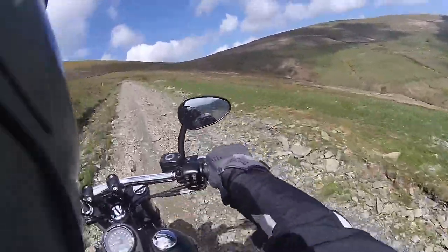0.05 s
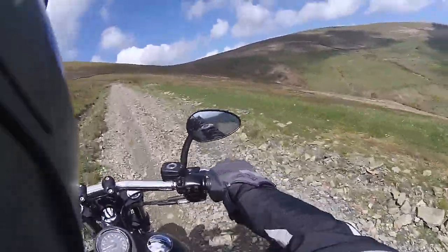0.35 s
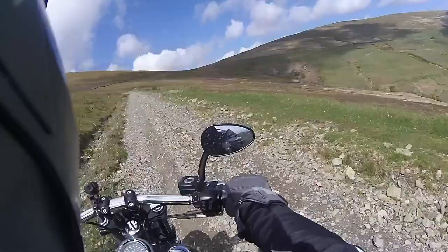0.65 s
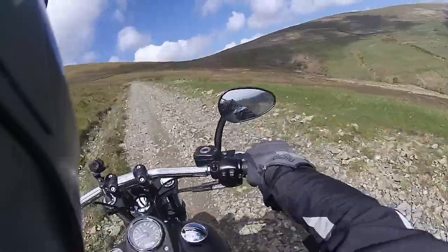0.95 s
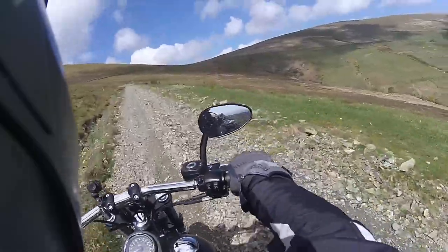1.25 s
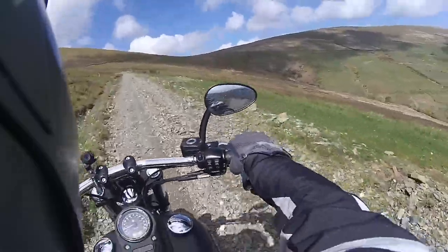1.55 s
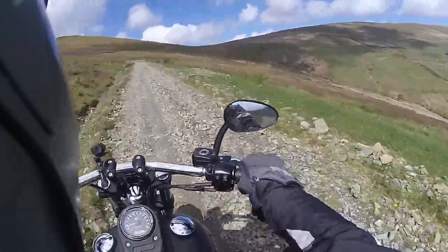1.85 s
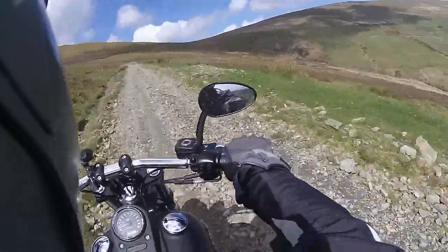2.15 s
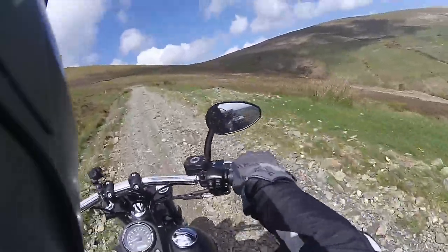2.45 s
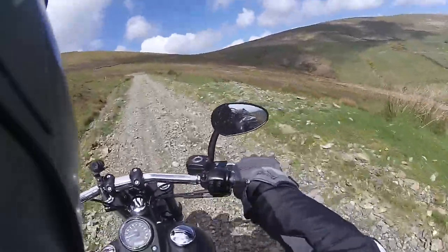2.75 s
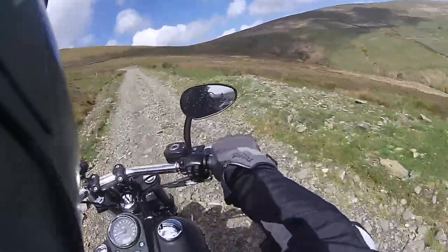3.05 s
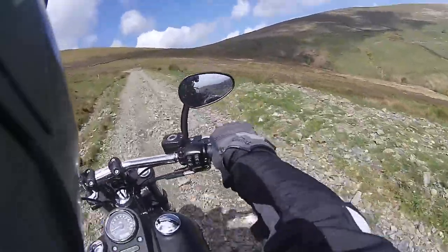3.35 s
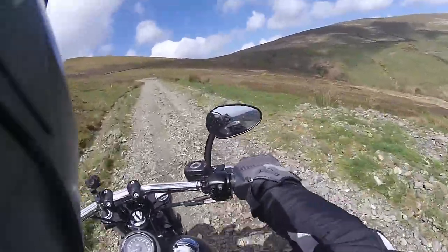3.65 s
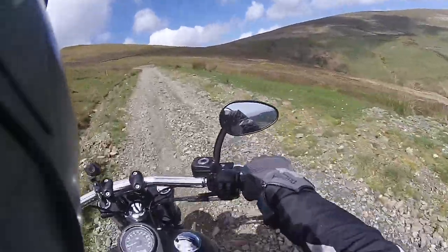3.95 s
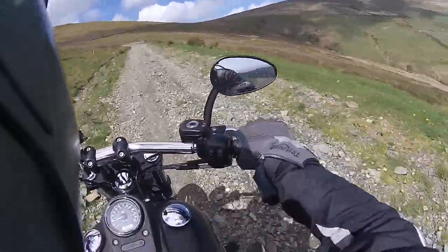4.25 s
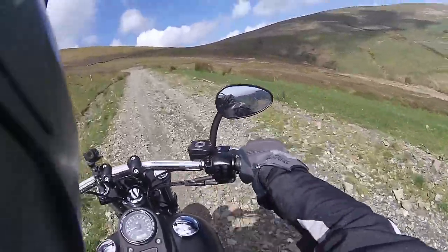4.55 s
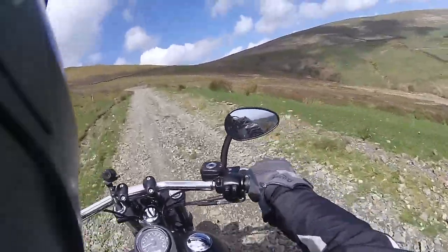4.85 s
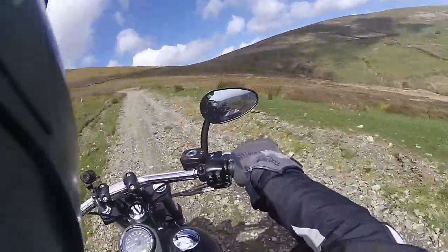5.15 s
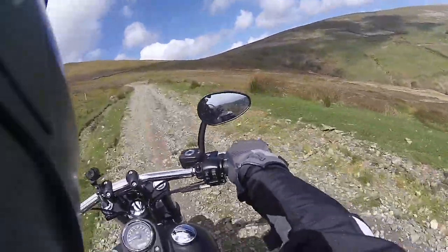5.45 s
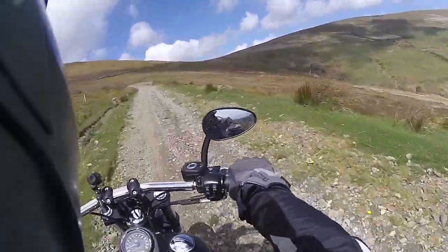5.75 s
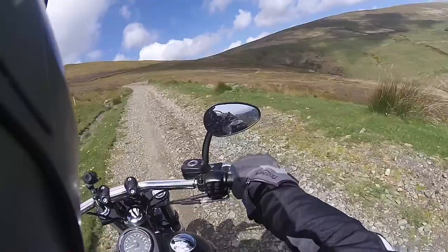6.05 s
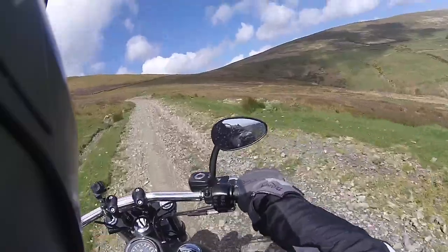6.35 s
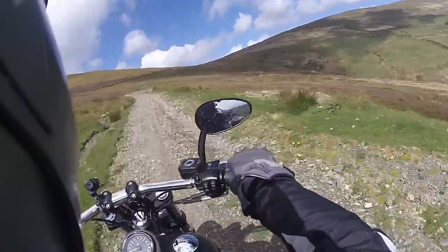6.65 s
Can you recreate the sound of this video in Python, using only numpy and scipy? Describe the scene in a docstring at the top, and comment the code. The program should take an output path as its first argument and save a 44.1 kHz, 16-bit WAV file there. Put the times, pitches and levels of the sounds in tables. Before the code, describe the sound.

An air-cooled V-twin motorcycle plods along a stony track, heard close from the rider's helmet. The exhaust thumps unevenly at low, fairly steady revs, with a metallic chatter on top. Gravel crunches and scrapes under the tyres and stones clack against metal. The suspension gives one dull knock about a second in, loose parts rattle over the bumps, and faint, brief squeals come near the end.

```python
"""V-twin motorcycle on a stony track.

An air-cooled V-twin plods uphill, heard from the rider's helmet. Two unevenly spaced firings a cycle
thump through two pipes, each with a rush of gas and a metallic chatter. Gravel crunches, scrapes and
spits under the tyres, stones clack on metal, loose parts rattle, knock and squeal, and the suspension
knocks once."""
import sys
import numpy as np
from scipy import signal
from scipy.io import wavfile
from scipy.ndimage import uniform_filter1d

SR = 44100
rng = np.random.default_rng(int(sys.argv[2]) if len(sys.argv) > 2 else 0)


def dump(signal):
    """Clip the signal to [-1, 1] and save it as 16-bit WAV at the path in sys.argv[1]."""
    limited = np.clip(np.atleast_2d(signal).T, -1, 1)
    pcm = np.round(limited * 32767).astype(np.int16)
    wavfile.write(sys.argv[1], SR, pcm)


N = 295911
TIME = np.arange(N) / SR

# Engine speed. Each row: time in seconds, speed in rpm.
ENGINE_RPM = [(0.0, 1577.0), (0.47, 1686.0), (0.67, 1463.0), (0.91, 1752.0), (1.14, 1560.0), (1.49, 1721.0),
              (1.87, 1579.0), (2.02, 1786.0), (2.19, 1639.0), (2.39, 1755.0), (2.86, 1754.0),
              (3.01, 1657.0), (3.15, 1754.0), (3.71, 1698.0), (3.85, 1568.0), (4.67, 1733.0),
              (4.81, 1667.0), (5.47, 1739.0), (6.71, 1908.0)]


def effort(surge_lead_s=0.048, db_per_rpm=-0.0205):
    """Engine load in dB: the throttle, eased just before the speed tops its local mean."""
    # Each row: time in seconds, throttle in dB.
    throttle = [(0, -3.5), (.36, 0.4), (.56, -5), (.66, -4), (.78, -2), (.92, 4), (1.08, -3.5), (1.3, 0.6),
                (1.8, -1.5), (2.4, 2), (2.68, 1.3), (2.95, -2.5), (3.15, 1), (3.6, -1.5), (3.78, -5),
                (4.03, -6), (4.21, -0.5), (4.47, 0.75), (5.0, -0.4), (6.12, 0.76), (6.71, -1)]
    rpm = curve(ENGINE_RPM)
    surge_rpm = np.interp(TIME + surge_lead_s, TIME, rpm) - uniform_filter1d(rpm, SR // 2)
    return curve(throttle) + db_per_rpm * surge_rpm


def strokes(lag_cycles, spread_db, jitter_s, first_firing_cycles=.64):
    """One impulse per four-stroke cycle (two turns), lag_cycles after the front firing."""
    cycles = np.cumsum(curve(ENGINE_RPM)) / (120 * SR) - first_firing_cycles - lag_cycles
    whole = np.arange(np.ceil(cycles[0]), cycles[-1])
    late, strength = rng.standard_normal((128, 2))[:len(whole)].T
    onsets = np.searchsorted(cycles, whole) + (late * jitter_s * SR).astype(int)
    out = np.zeros(N)
    out[np.clip(onsets, 0, N - 1)] = amp(spread_db * strength)
    return out


def exhaust(front, rear, load_db):
    """Each blow-down rings its pipe and silencer; crack and bark grow faster with load than the thump."""
    edge = amp(load_db) * crack_and_bark(front, rear)
    pulses = thump(front, rear) + edge + silencer_ring(front, rear)
    return amp(-20.5 + 0.71 * load_db) * pulses + rush(front, rear, load_db)


def thump(front, rear, muffler_hz=560):
    """Low standing waves of both pipes, muffled by the silencers."""
    # Each row: frequency in Hz, width in Hz, gain in dB.
    front_waves = [(83, 33.9, 9.5), (117.8, 26.1, 8.5), (140.2, 24.7, 10.5), (152.3, 65, 7),
                   (268.1, 21, -2)]
    rear_waves = [(75.8, 26, 5.5), (131.53, 24.75, 17.5), (142.1, 35, 16), (159.2, 20.9, 11.5),
                  (215.6, 46.5, -7.5)]
    waves = pipe(front, front_waves) + pipe(rear, rear_waves)
    outlet = signal.lfilter(*signal.butter(2, 50, "high", fs=SR), waves)
    outlet = outlet - .5 * resonate(outlet, 41, 3.7)  # a narrow dip at 41 Hz thins the low hum
    return unit(lowpass(outlet, muffler_hz))


def pipe(impulses, waves):
    """Neighbouring standing waves reach the open end in opposite phase."""
    return sum((-1) ** k * amp(db) * resonate(impulses, hz, width_hz)
               for k, (hz, width_hz, db) in enumerate(waves))


def crack_and_bark(front, rear):
    """The exhaust valve cracks open; the blow-down leaves with a second crack and a low, ringing bark."""
    # Each row: frequency in Hz, gain in dB.
    crack_spectrum = [(150, -14), (380, -1), (700, 0), (950, -8), (1300, -17), (2500, -45)]
    bark_spectrum = [(35, -34), (100, -11), (200, 6), (282, 14), (345, -6), (450, -4), (1200, -50),
                     (3000, -74)]
    opening = .65 * delayed(front, .0017) + .4 * delayed(rear, .0022)
    leaving = -delayed(front, .0054) - .55 * delayed(rear, .009)
    crack = unit(colour(uneven(opening + leaving, spread_db=1.0), crack_spectrum))
    bark = unit(colour(leaving, bark_spectrum))
    return amp(-20) * crack + amp(-17) * bark


def silencer_ring(front, rear, full_drone_rpm=1791, db_per_rpm=0.2):
    """All firings ring the silencers' overtones; the front one also drones as the revs rise."""
    # Each row: frequency in Hz, width in Hz, gain in dB.
    overtone_waves = [(418.6, 22, 1), (460.8, 13.7, 1), (588, 18.5, -1), (651, 37, -3), (697.7, 11, 0),
                      (764, 20, -5), (887, 21, -8.5)]
    drone_waves = [(230, 12.6, 2), (281.6, 27, 5), (460, 12, -23)]
    overtones = amp(-19.8) * standing(front + 1.38 * rear, overtone_waves)
    drone_db = -10 + db_per_rpm * np.minimum(curve(ENGINE_RPM) - full_drone_rpm, 0)
    return overtones + amp(drone_db) * standing(front, drone_waves)


def rush(front, rear, load_db, db_per_rpm=-0.01):
    """Turbulent gas follows each blow-down, most when the engine lugs at low revs."""
    # Each row: frequency in Hz, gain in dB.
    spectrum = [(120, -33), (270, 9), (330, 2.5), (450, 5), (530, -11.5), (610, 7.5), (730, 1), (830, 1.5),
                (1000, -11), (1250, -6), (1480, -22), (2000, -22.5), (4000, -26), (9000, -46)]
    front_blast = puffs(uneven(front, spread_db=1.2), rise_s=.001, fall_s=.007, delay_s=.003)
    rear_blast = puffs(uneven(rear, spread_db=1.2), rise_s=.0015, fall_s=.011, delay_s=.004)
    flow = .1 + front_blast + .65 * rear_blast
    gas = unit(colour(flow * gritty(spread_db=1.5), spectrum))
    smooth_rpm = uniform_filter1d(curve(ENGINE_RPM), SR)
    lugging_db = db_per_rpm * (smooth_rpm - smooth_rpm.mean())
    return amp(-41.5 + 1.05 * load_db + lugging_db) * gas


def chatter(front, rear, load_db):
    """Each firing shakes pistons and cooling fins into a ringing rasp over a steady mechanical hiss."""
    # Each row: frequency in Hz, width in Hz, gain in dB.
    fin_modes = [(2220, 82, 2.5), (2880, 91, 10), (3050, 46, -9), (5100, 78, -6), (7030, 190, -4),
                 (9870, 190, -2.5)]
    # Each row: frequency in Hz, gain in dB.
    spectrum = [(700, 6.5), (1400, 2), (2000, -5.5), (2300, 14), (2600, 1), (2900, 2), (3500, 7.5),
                (6500, 3.5), (8000, 8.5), (9700, 10), (11000, 6), (12400, 4), (13600, -30), (15000, -35)]
    shake = puffs(front, rise_s=.0013, fall_s=.008, delay_s=.0045)
    shake += .88 * puffs(rear, rise_s=.0012, fall_s=.0075, delay_s=.0055)
    rasp = shake * gritty(spread_db=1.5) + .35 * gritty(spread_db=0.2)
    fins = sum(amp(db) * resonate(rasp, hz, width_hz) for hz, width_hz, db in fin_modes)
    return amp(-48 + 0.64 * load_db) * unit(colour(rasp + fins, spectrum))


def shield(front, rear, load_db):
    """A loose metal shield chatters against its clamp after every firing."""
    # Each row: frequency in Hz, width in Hz, gain in dB.
    shield_modes = [(1161, 31, 26), (1268, 8.3, 23.5)]
    shake = puffs(front, rise_s=0.00096, fall_s=0.013, delay_s=0.003)
    shake += 0.13 * puffs(rear, rise_s=0.00084, fall_s=0.0054, delay_s=0.0023)
    contact = shake * gritty(spread_db=4)
    ring = sum(amp(db) * resonate(contact, hz, width_hz) for hz, width_hz, db in shield_modes)
    return amp(-52 + 0.81 * load_db) * unit(ring)


def pings(front, rear, load_db, rear_db=-3):
    """Under load the firings crack against the cylinder walls, now and then in hard bouts."""
    # Each row: start in seconds, length in seconds, boost in dB.
    bouts = [(.03, .11, 18), (.33, .04, 14), (1.15, .025, 9), (1.29, .03, 15.5), (1.33, .03, 15),
             (1.37, .03, 8), (1.44, .03, 17.5), (1.95, .06, 21), (2.23, 0.078, 11), (4.2, .04, 8),
             (3.06, .1, 10), (4.355, .03, 16), (4.39, .065, 17.5), (4.46, .09, 17), (4.635, .03, 12),
             (5.2, .62, 10), (6.11, .04, 13)]
    spectrum_hz_db = [(300, -14.0), (800, 6.5), (1300, 18.0), (1900, -7.0), (2400, 8.5), (3600, -0.5),
                      (7000, -4.0), (11000, 3.5), (13500, -23)]
    firings = (front + amp(rear_db) * rear) * amp(spells(bouts)) * amp(-50 + 2.6 * load_db)
    cracks = puffs(firings, rise_s=.0009, fall_s=.007, delay_s=.003)
    return colour(cracks * gritty(spread_db=2), spectrum_hz_db)


def valves():
    """Valves click onto their seats at set crank angles."""
    # Each row: lag after the front firing in cycles, gain in dB, ring in Hz, width in Hz.
    seatings = [(.255, -45.5, 1250, 130), (.335, -49.5, 1210, 180), (.715, -60, 1820, 800),
                (.5, -60, 2860, 110), (.84, -66, 4900, 1400)]
    spectrum_hz_db = [(500, -21.5), (1800, -4.0), (11000, -10), (13500, -13)]
    out = np.zeros(N)
    for lag_cycles, db, hz, width_hz in seatings:
        clicks = strokes(lag_cycles, spread_db=2.5, jitter_s=.0005)
        out += amp(db) * unit(resonate(clicks, hz, width_hz))
    return colour(out, spectrum_hz_db)


def tyres(stones_per_s=600, rumble_db=-32):
    """Stones snap and grind under the tread above a low rumble of ground and air."""
    # Each row: time in seconds, crunch level in dB.
    stoniness = [(0, -41.5), (.8, -41.5), (1.0, -38.5), (1.22, -42.5), (1.75, -44), (2.05, -39.5),
                 (2.6, -41), (2.82, -38), (3.05, -45), (3.38, -38), (3.7, -43.5), (4.1, -42), (4.3, -39.5),
                 (4.6, -42), (4.82, -41.5), (5.05, -43), (6.0, -41), (6.45, -40.5), (6.71, -37)]
    # Each row: frequency in Hz, gain in dB.
    crunch_spectrum = [(200, 8), (600, 15), (1300, 13), (2000, -3.5), (2400, 2), (3000, 0.5), (3700, -7.5),
                       (6000, -3.5), (10500, -12), (13500, -32)]
    rumble_spectrum = [(15, -5), (42, -1), (90, 7), (160, 17), (300, 9.5), (700, -5.5), (2000, -36.5)]
    breaks = puffs(random_hits(stones_per_s, weakest=.25), rise_s=.0002, fall_s=0.007)
    crunch = unit(colour(breaks * rng.standard_normal(N), crunch_spectrum))
    rumble = unit(colour(rng.standard_normal(N), rumble_spectrum))
    return amp(curve(stoniness)) * crunch + amp(rumble_db) * rumble


def scrapes(peak_share=0.47):
    """The tread slides over loose gravel: a dense grinding that swells and fades."""
    # Each row: start in seconds, length in seconds, level in dB.
    slides = [(.86, .23, -46), (1.868, 0.092, -46), (3.267, 0.14, -41.5), (3.39, 0.1, -38.5),
              (4.21, .14, -44.5), (4.7, 0.26, -44), (5.95, 0.33, -47)]
    # Each row: frequency in Hz, gain in dB.
    spectrum = [(500, -5.5), (1100, 4.5), (1550, 7), (1900, -3), (2300, -0.5), (3050, -1), (3500, -13),
                (4600, -11), (7000, -21), (13000, -34)]
    envelope = np.zeros(N)
    for start_s, length_s, db in slides:
        progress = np.linspace(0, 1, int(length_s * SR))
        add(envelope, start_s, amp(db) * np.sqrt(np.interp(progress, [0, peak_share, 1], [0, 1, 0])))
    return envelope * unit(colour(gritty(spread_db=2.5), spectrum))


def pebbles(per_s=12, level_db=-63):
    """Now and then a bigger pebble breaks loose with a dry, dull tick."""
    spectrum_hz_db = [(600, -8), (1400, 3), (3000, 0), (5000, -7), (9000, -14), (13000, -36)]
    ticks = puffs(random_hits(per_s, weakest=.4), rise_s=.0005, fall_s=.006) * rng.standard_normal(N)
    return amp(level_db) * unit(colour(ticks, spectrum_hz_db))


def flying_stones():
    """Pinched stones shoot away with a bright snap; some clack against the bike's metal."""
    # Each row: start in seconds, gain in dB, ring in Hz.
    spits = [(.352, -38, 8300), (.369, -43, 9300), (.383, -43, 9800), (.632, -43, 9500), (.644, -42, 8700),
             (.649, -39, 10000), (.661, -36, 8950), (.671, -38, 9300), (.6825, -44, 8600),
             (1.579, -39, 9920), (2.521, -38, 11000), (2.758, -42, 8050), (3.107, -40, 10100),
             (3.147, -42, 8810), (3.236, -38, 10300), (3.283, -41, 8280), (3.609, -37.5, 10600),
             (3.716, -44, 10200), (3.787, -36, 10100), (4.223, -36, 9690), (5.335, -36, 10800),
             (5.564, -42, 10700), (5.798, -34.5, 9430), (6.127, -36.5, 10100)]
    clacks = [(.0862, -41, 2500), (.613, -30, 2850), (.6185, -41, 4400), (.640, -38, 4700),
              (1.3105, -35, 3700), (1.3433, -31.5, 4300), (1.9939, -39, 2900), (2.6544, -34, 2300),
              (2.688, -40, 4400), (2.701, -27, 2450), (2.7105, -35, 2700), (4.368, -31, 2300),
              (4.3984, -37, 3200), (4.4388, -33, 2920), (4.6104, -38, 2300), (5.7683, -38, 3200)]
    # Each row: frequency in Hz, gain in dB.
    spit_spectrum = [(1500, -24), (4000, -18), (8000, 8), (11500, 4), (13800, -18)]
    clack_spectrum = [(400, -14), (1200, 13.5), (3200, 2), (6000, -4), (11000, -7), (13800, -24)]
    return (snaps(spits, spit_spectrum, rise_s=.00047, fall_s=0.0066, ring_db=9, width_hz=720)
            + snaps(clacks, clack_spectrum, rise_s=.0004, fall_s=.007, ring_db=0, width_hz=600))


def rattles(ring_db=7):
    """Bumps set off brief showers of small impacts, each ringing the part that shakes."""
    # Each row: start in seconds, gain in dB, length in seconds, ring in Hz.
    showers = [(0.615, -31, 0.037, 1240), (1.875, -36, 0.081, 1350), (2.681, -38, 0.017, 2090),
               (2.695, -36, 0.022, 1500), (2.74, -43, 0.012, 1240), (3.834, -40.5, 0.063, 1310),
               (3.929, -43, 0.1, 1270), (4.225, -42, 0.036, 1530), (4.25, -32, 0.017, 900),
               (6.625, -38.5, 0.12, 1530)]
    # Each row: frequency in Hz, gain in dB.
    spectrum = [(250, -19), (700, 10), (1280, 8.5), (1900, -12), (2400, 8.5), (2900, -8), (3700, -6.5),
                (6000, -19), (10500, -2), (13500, -30)]
    out, impacts = np.zeros(N), colour(gritty(spread_db=2.8), spectrum)
    for start_s, db, length_s, hz in showers:
        envelope = swell(length_s, rise_share=0.13)
        shower = excerpt(impacts, start_s, len(envelope))
        ring = resonate(shower, hz, width_hz=260 * np.sqrt(hz / 1300))
        add(out, start_s, amp(db) * unit(shower + amp(ring_db) * ring) * envelope)
    return out


def loose_parts():
    """Jolts set a steel fitting clinking, the shield slapping its clamp and a hollow part knocking."""
    # Each row: start in seconds, gain in dB.
    clinks = [(.613, -35), (.634, -40), (6.624, -44), (6.648, -36), (6.681, -43)]
    slaps = [(.055, -34), (.128, -32), (.294, -25.5), (.350, -29), (1.161, -31), (1.266, -28), (2.655, -24),
             (3.491, -26.5), (4.509, -28)]
    bumps = [(.834, -23), (1.161, -25), (1.195, -20), (1.270, -24), (1.699, -16), (1.773, -30),
             (1.962, -22), (1.995, -19), (2.274, -22), (2.316, -24), (2.415, -23), (2.453, -24),
             (2.623, -26), (4.438, -22), (4.470, -24)]
    # Each row: frequency in Hz, gain in dB, T60 in seconds.
    fitting_modes = [(1604, -3, 0.066), (2490, -18, 0.072), (2960, 1, 0.036), (3110, -3, 0.11),
                     (4500, -11, 0.14), (5400, -30, 0.045)]
    shield_modes = [(1238, 1, 0.042), (1280, -2.5, 0.019), (1470, -10, .02)]
    hollow_modes = [(616, 1, .035), (750, -6.5, 0.038), (452, 1, 0.029)]
    return (struck(clinks, fitting_modes, rise_s=.001)
            + struck(slaps, shield_modes, rise_s=0.00086)
            + struck(bumps, hollow_modes, rise_s=0.0022))


def fork_knock():
    """The fork hits its stop: a dull blow into a few short modes of fork and frame."""
    # Each row: start in seconds, gain in dB.
    blows = [(0.8655, -7), (0.878, -17)]
    # Each row: frequency in Hz, gain in dB, T60 in seconds.
    frame_modes = [(346, -2.5, 0.077), (450, 4.5, 0.019), (580, 3, 0.0093), (713, -13.5, 0.057),
                   (1010, -19, .018)]
    return -lowpass(struck(blows, frame_modes, rise_s=0.00086), 1300)


def squeals(waver_hz=38):
    """A rubbing part sings: a narrow, unsteady tone swells, slides down and fades."""
    # Each row: start in seconds, length in seconds, gain in dB, first and last pitch in Hz.
    rubs = [(5.87, 0.15, -37, 1240, 1178), (6.0, 0.17, -40, 1193, 1166), (6.612, 0.134, -37, 1254, 1208)]
    out = np.zeros(N)
    waver = lowpass(rng.standard_normal(N) + 1j * rng.standard_normal(N), waver_hz)
    for start_s, length_s, db, first_hz, last_hz in rubs:
        progress = np.linspace(0, 1, int(length_s * SR))
        turns = np.cumsum(first_hz + (last_hz - first_hz) * progress ** 0.72) / SR
        tone = (excerpt(waver, start_s, len(turns)) * np.exp(2j * np.pi * turns)).real
        add(out, start_s, amp(db) * unit(tone) * swell(length_s, rise_share=0.24))
    return out


def pips(per_s=220, level_db=-59, pitches=48):
    """Faint, very short high pips at random pitches."""
    t, out = np.arange(SR // 50) / SR, np.zeros(N)
    envelope = np.exp(-t / .0022) * (1 - np.exp(-t / .0005))
    for hz in rng.uniform(7600, 11400, pitches):
        hits = random_hits(per_s / pitches, weakest=.3)
        out += signal.oaconvolve(hits, np.sin(2 * np.pi * hz * t) * envelope)[:N]
    return amp(level_db) * unit(out)


def hiss(hz=10800, width_hz=900):
    """A thin, high hiss comes and goes."""
    # Each row: time in seconds, level in dB.
    levels = [(0, -54), (.3, -60), (.55, -63), (1.15, -56), (1.7, -63), (2.5, -54.5), (3.0, -62),
              (4.0, -58), (4.45, -55), (5.0, -59), (5.35, -53), (5.8, -57), (6.71, -57)]
    band = resonate(gritty(spread_db=3.5), hz, width_hz)
    return amp(curve(levels)) * unit(resonate(band, hz, width_hz))


def struck(blows, modes, rise_s):
    """Each blow rings an object's decaying modes."""
    t, out = np.arange(SR // 5) / SR, np.zeros(N)
    ring = sum(amp(db - 60 * t / t60_s) * np.sin(2 * np.pi * hz * t) for hz, db, t60_s in modes)
    ring *= 1 - np.exp(-t / rise_s)
    for start_s, db in blows:
        add(out, start_s, amp(db) * ring)
    return out


def snaps(hits, spectrum, rise_s, fall_s, ring_db, width_hz):
    """Short gritty cracks, each with its own ring."""
    t, out = np.arange(SR // 20) / SR, np.zeros(N)
    envelope = (1 - np.exp(-t / rise_s)) * np.exp(-t / fall_s)
    grit = colour(gritty(spread_db=2.0), spectrum)
    for start_s, db, hz in hits:
        snap = excerpt(grit, start_s, len(t))
        snap = unit(snap + amp(ring_db) * resonate(snap, hz, width_hz))
        add(out, start_s, amp(db) * snap * envelope)
    return out


def standing(impulses, waves):
    """Standing waves that build up and die away after each impulse."""
    return unit(sum(amp(db) * resonate(resonate(impulses, hz, width_hz), hz, width_hz)
                    for hz, width_hz, db in waves))


def puffs(impulses, rise_s, fall_s, delay_s=0):
    """Envelope that swells and dies after each impulse."""
    t = np.maximum(np.arange(SR // 8) / SR - delay_s, 0)
    shape = (1 - np.exp(-(t / rise_s) ** 2)) * np.exp(-t / fall_s)
    return signal.oaconvolve(impulses, shape / shape.max())[:N]


def swell(length_s, rise_share):
    """Envelope with a linear rise and a square-root fade."""
    progress = np.linspace(0, 1, int(length_s * SR))
    return np.minimum(progress / rise_share, 1) * np.sqrt(1 - progress)


def gritty(spread_db):
    """Noise made of tiny impacts of uneven size."""
    noise = rng.standard_normal(N)
    grain_db = spread_db * np.repeat(rng.standard_normal(N // 24 + 1), 24)[:N]
    return unit(noise * amp(grain_db))


def random_hits(per_s, weakest):
    """Impulses of random timing and size."""
    return (rng.random(N) < per_s / SR) * rng.uniform(weakest, 1, N)


def uneven(firings, spread_db):
    """No two firings are equally strong."""
    return firings * amp(spread_db * np.clip(rng.standard_normal(N), -2, 2))


def colour(x, spectrum, size=16384):
    """Causal filter with the given spectrum: it rings only after each push."""
    hz, db = np.transpose(spectrum)
    bin_hz = abs(np.fft.fftfreq(size, 1 / SR)) + 1
    log_gain = np.log(amp(np.interp(np.log(bin_hz), np.log(hz), db)))
    ring = np.fft.ifft(np.exp(np.conj(signal.hilbert(log_gain)))).real[:size // 2]
    return signal.oaconvolve(x, ring)[:N]


def resonate(x, hz, width_hz):
    """One resonance of gain 1."""
    return signal.lfilter(*signal.iirpeak(hz, hz / width_hz, fs=SR), x)


def lowpass(x, hz):
    """Two-pole low-pass."""
    return signal.lfilter(*signal.butter(2, hz, fs=SR), x)


def curve(rows):
    """A (seconds, value) table at every sample."""
    return np.interp(TIME, *np.transpose(rows))


def spells(rows):
    """Each row's dB while it lasts, zero elsewhere."""
    return sum(db * ((TIME > start_s) & (TIME < start_s + length_s)) for start_s, length_s, db in rows)


def excerpt(x, start_s, samples):
    """A stretch of x, wrapping at the end."""
    return np.roll(x, -int(start_s * SR))[:samples]


def delayed(x, delay_s):
    """The same sound, later."""
    out = np.zeros(N)
    add(out, delay_s, x)
    return out


def add(mix, start_s, sound):
    """Mixes a sound in at start_s."""
    part = mix[max(round(start_s * SR), 0):][:len(sound)]
    part += sound[:len(part)]


def amp(db):
    """Decibels to gain."""
    return 10 ** (np.asarray(db) / 20)


def unit(x):
    """Scales to rms 1."""
    return x / np.sqrt(np.mean(x ** 2) + 1e-20)


def scene():
    """Engine, gravel and loose parts meet at one point, the low end leaning left."""
    # Weak or strong firings. Each row: start in seconds, length in seconds, gain in dB.
    stumbles = [(.63, .06, 1), (3.755, .035, -6), (3.8, .03, -3), (3.98, .04, -10), (4.17, .03, -1.5)]
    load_db = effort()
    front = strokes(lag_cycles=0, spread_db=.6, jitter_s=.0001)
    rear = strokes(lag_cycles=.412, spread_db=.8, jitter_s=.00015)
    burn = amp(spells(stumbles))
    pipes = exhaust(front * burn, rear * burn, load_db)
    metal = chatter(front, rear, load_db) + shield(front, rear, load_db)
    metal += pings(front, rear, load_db) + valves()
    crackle = tyres() + scrapes() + pips() + pebbles() + flying_stones()
    mono = pipes + metal + hiss() + squeals() + crackle + rattles() + loose_parts() + fork_knock()
    side = .084 * signal.oaconvolve(mono, signal.firwin(61, 2000, fs=SR), "same") + .001 * mono
    return np.array([mono + side, mono - side])


def record(dry, cutoff_hz=15250):
    """Steep treble band limit."""
    taps = signal.firwin(511, cutoff_hz, window=("kaiser", 9), fs=SR)
    return signal.oaconvolve(dry, taps[None], "same")


dry = scene()
out = record(dry)
dump(out)
```